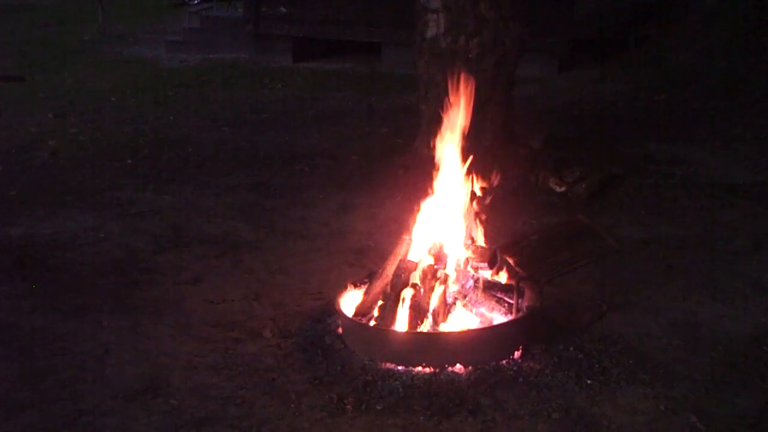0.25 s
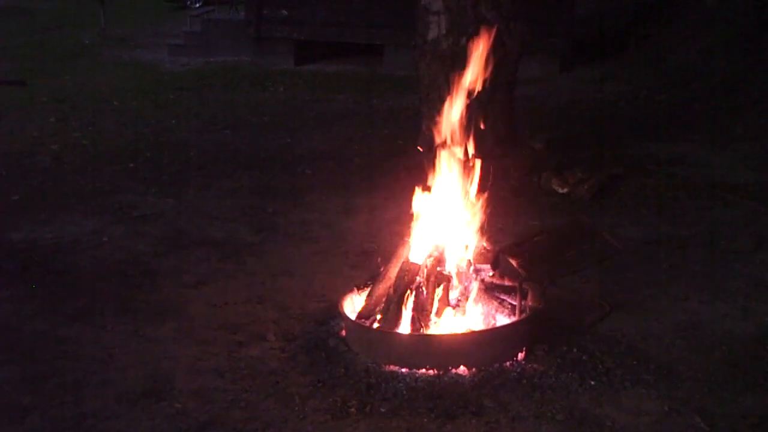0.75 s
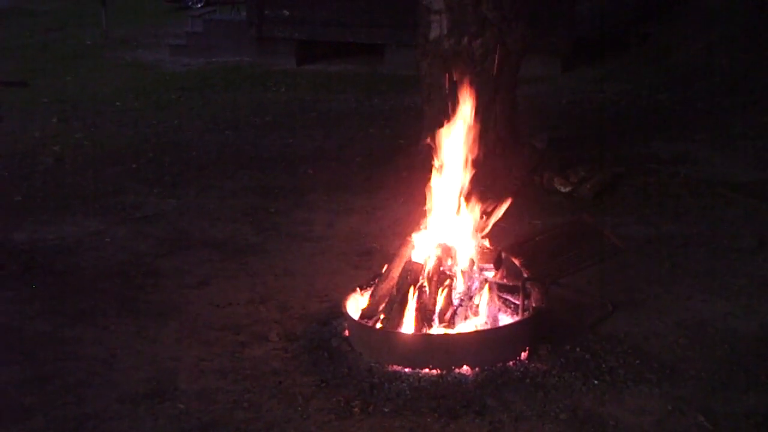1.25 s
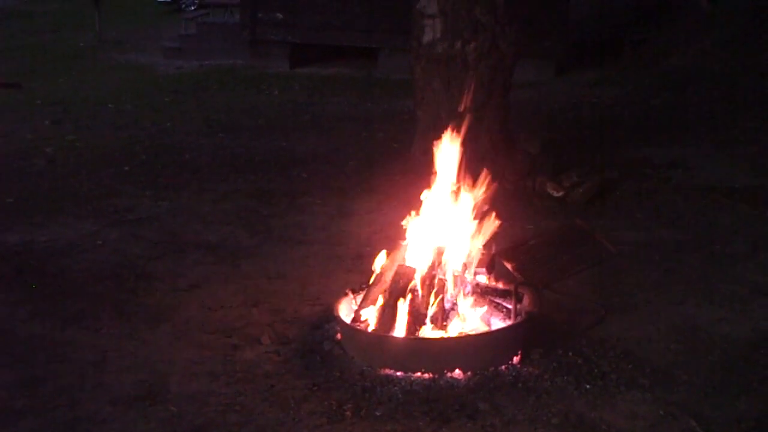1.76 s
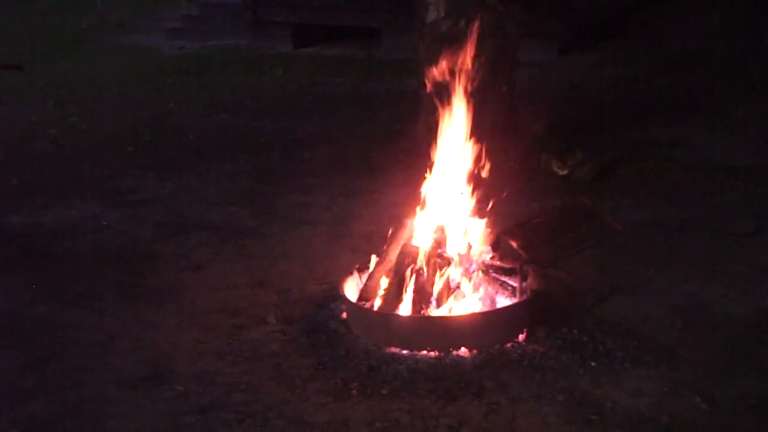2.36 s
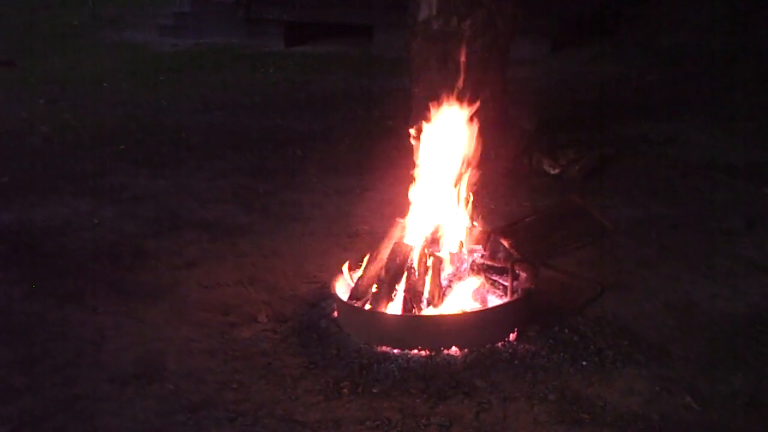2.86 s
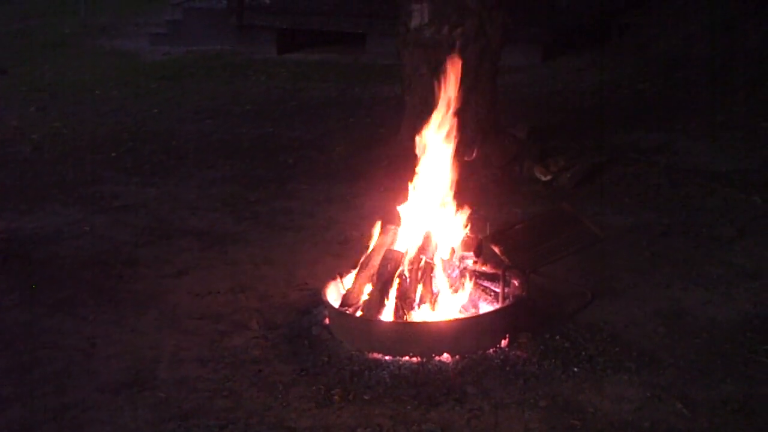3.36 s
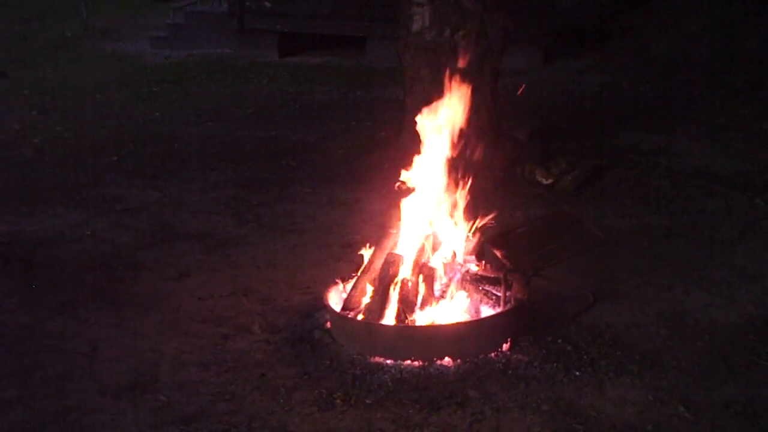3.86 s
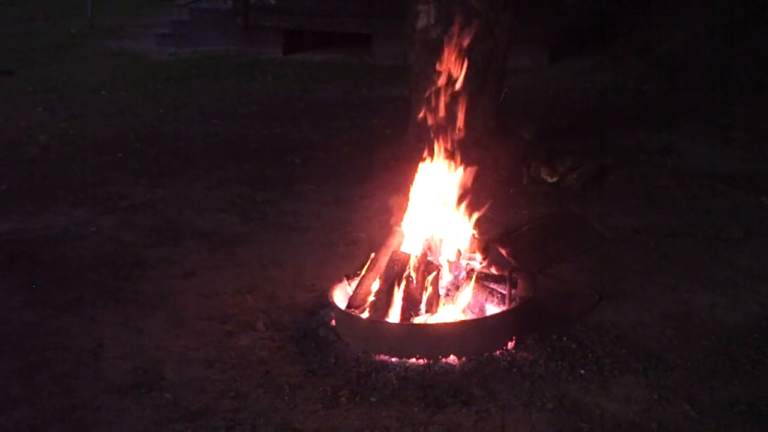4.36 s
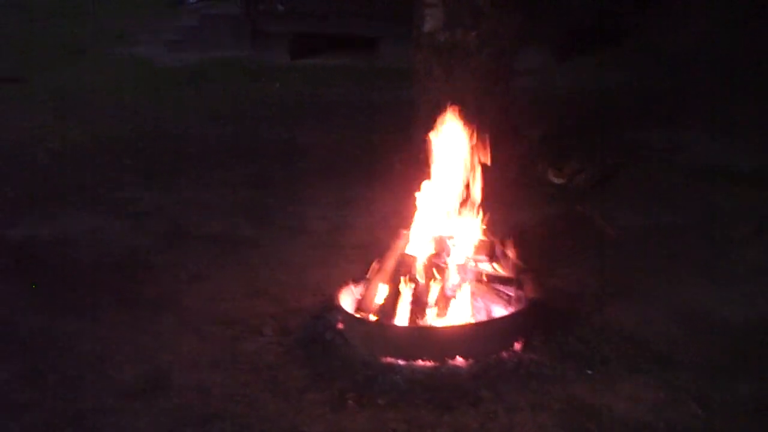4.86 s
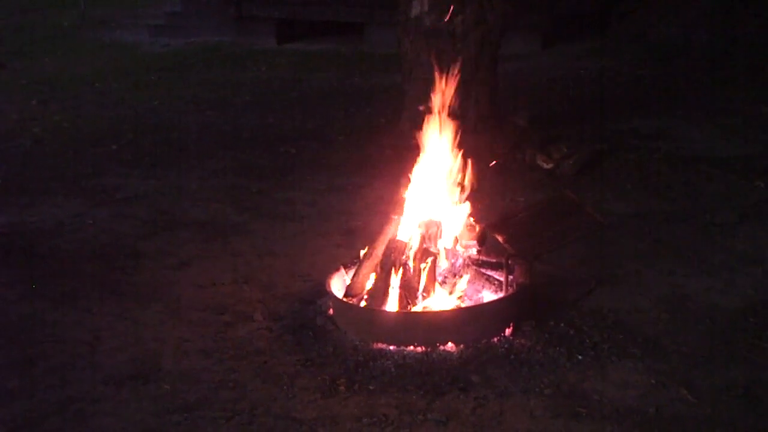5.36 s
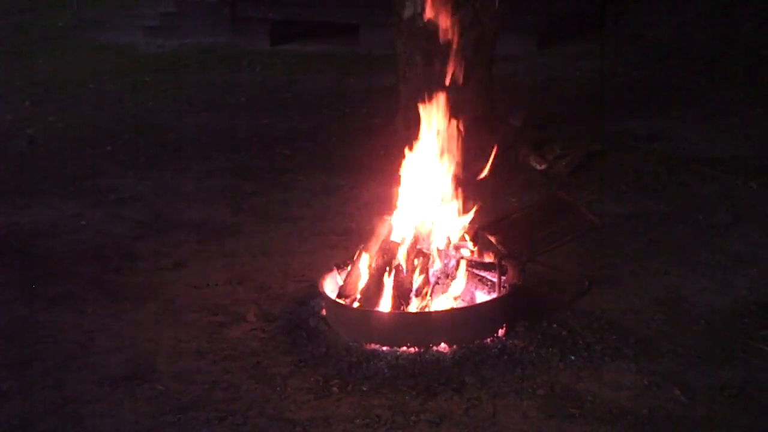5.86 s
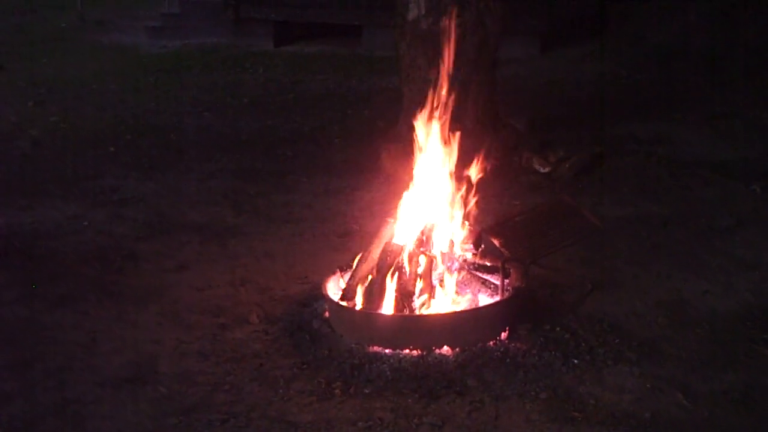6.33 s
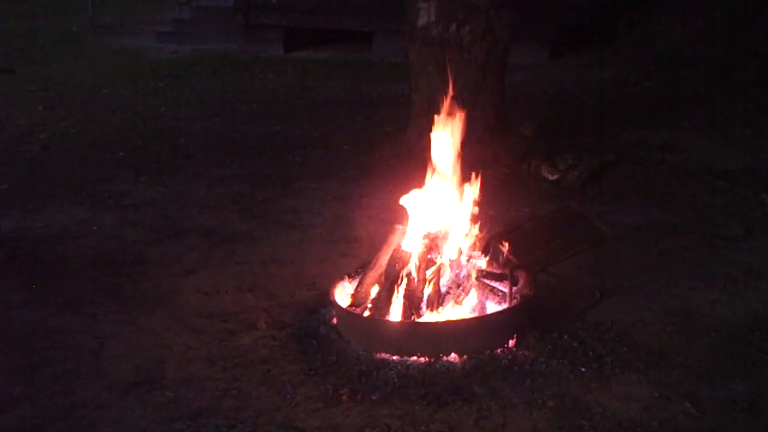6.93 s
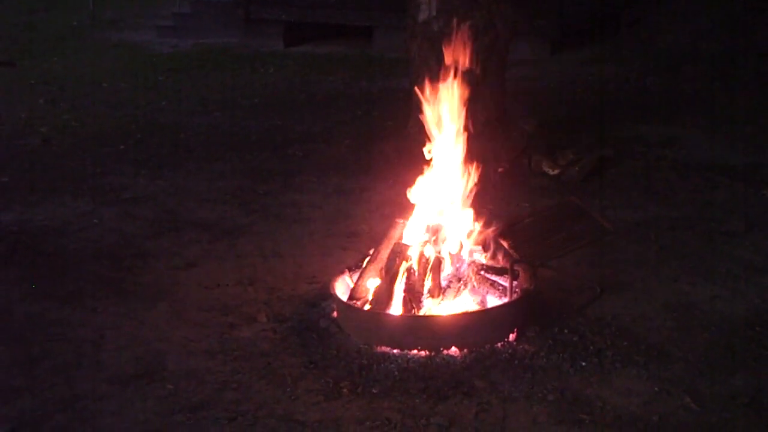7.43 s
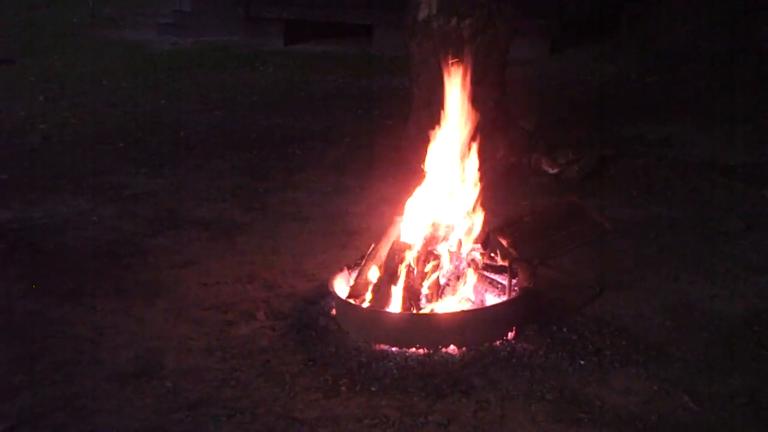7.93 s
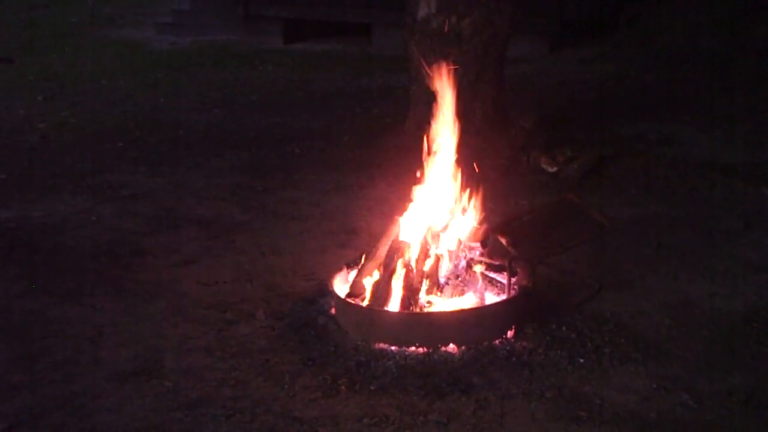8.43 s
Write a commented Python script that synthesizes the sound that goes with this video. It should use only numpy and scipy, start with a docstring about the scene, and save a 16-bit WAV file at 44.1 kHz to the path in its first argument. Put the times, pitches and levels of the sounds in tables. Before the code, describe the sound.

A wood fire flutters, rumbles and crackles in a yard at dusk, one huge snap ringing out over faint insects, cricket and katydid trills.

```python
"""A wood fire flutters and rumbles in a yard at dusk: dips of flame pressure over turbulent noise.
Behind it a far insect chorus shimmers in noise bands, a machine and a thin whine sound faintly in sines.
Soon the logs tick, pop and spit gas: clicks, bursts and grains ring resonances and echo off trees and a house.
A cricket and a katydid trill in pulsed tones, one very loud snap clips, a far bird whistles once in a gliding
sine, and near the end a jet of flame flares on a rough, hollow note."""
import sys
import numpy as np
from scipy import signal
from scipy.fft import rfft, irfft
from scipy.io import wavfile

SR = 44100
rng = np.random.default_rng(int(sys.argv[2]) if len(sys.argv) > 2 else 0)


def unload_audio(sound):
    """Save the sound as a 16-bit wav file, at the path given as the first command line argument."""
    columns = np.transpose(np.atleast_2d(sound))
    # keep every value between -1 and 1, then stretch to whole-number steps
    steps = np.round(np.clip(columns, -1, 1) * 32767)
    wavfile.write(sys.argv[1], SR, steps.astype(np.int16))


N = 383229
TIME = np.arange(N) / SR
FREQ = np.arange(N // 2 + 1) * SR / N


def undb(db):
    """Decibels to gain."""
    return 10 ** (np.asarray(db) / 20)


def unit(x):
    """Scale to rms 1."""
    return x / np.sqrt(np.mean(x ** 2))


def add(track, start_s, sound):
    """Mix a short sound into a track at a time."""
    i = int(start_s * SR)
    track[i:i + len(sound)] += sound[:N - i]


def colour(x, points):
    """Filter by a spectrum of (Hz, dB) points, interpolated over log frequency."""
    hz, db = np.transpose(points)
    gain = undb(np.interp(np.log(FREQ + 1), np.log(hz), db))
    return irfft(rfft(x) * gain, N)


def resonate(x, hz, width_hz):
    """A two-pole resonance."""
    b, a = signal.iirpeak(min(hz, SR / 3), hz / min(width_hz, SR / 4), fs=SR)
    return signal.lfilter(b, a, x)


def walk(rate_hz):
    """Smooth chance with spread 1."""
    return unit(irfft(rfft(rng.standard_normal(N)) / (1 + (FREQ / rate_hz) ** 4), N))


def wide_noise(side):
    """Two channels of noise that partly agree."""
    mid, other = rng.standard_normal((2, N))
    return mid + side * other * np.array([[1], [-1]])


def envelope(start_s, length_s, attack_s, release_s):
    """Rise, hold and fall, with rounded corners."""
    rise = (TIME - start_s) / attack_s
    fall = (start_s + length_s - TIME) / release_s
    return np.sin(np.pi / 2 * np.clip(np.minimum(rise, fall), 0, 1)) ** 2


def bouts(rows, attack_s, release_s):
    """Loudness of a sound that comes in bouts of (start s, length s, dB)."""
    return sum(undb(db) * envelope(start_s, length_s, attack_s, release_s) for start_s, length_s, db in rows)


def burst(hz, width_hz, decay_s, grit, size=1100):
    """A break with a few splinters behind it rings a steep resonance; rms 1 over 5 ms."""
    push = grit * rng.standard_normal(size) * np.exp(-np.arange(size) / SR / decay_s)
    push[0] += 1
    ring = resonate(resonate(push, hz, width_hz), hz, 2 * width_hz)
    return ring * np.sqrt(SR / 200 / np.sum(ring ** 2))


# One flap of the flames. Each row: frequency in Hz, relative level in dB.
FLAP_SPECTRUM = [(8, -5.5), (25, 1.5), (60, -0.5), (110, -7.5), (200, -18), (400, -34.5), (900, -60)]
# Rush of the flames. Each row: frequency in Hz, relative level in dB per Hz.
RUSH_SPECTRUM = [(10, 2.5), (25, 3), (50, 1), (90, -7), (130, -14), (200, -17), (300, -21), (500, -29),
                 (900, -34.5), (1500, -38.5), (3000, -38.5), (6000, -88.5)]
# The flames draw harder. Each row: start in seconds, length in seconds, level in dB.
DRAUGHTS = [(0, .6, -70), (7.25, 0.84, -71)]
DRAUGHT_ATTACK_S, DRAUGHT_RELEASE_S, DRAUGHT_HZ = 0.12, .2, 375
FLUTTER_DB, RUSH_DB, FLAPS_PER_S = -49.5, -51.0, 31


def flames(count=400):
    """The flame sheet collapses in soft dips of pressure, over a turbulent rush that surges now and then."""
    gap, strength = rng.standard_normal((count, 2)).T
    times_s = np.cumsum(np.exp(0.27 * gap) / FLAPS_PER_S)
    sizes = undb(3.3 * np.minimum(strength, 1))
    pulses = np.zeros(N)
    for start_s, size in zip(times_s, sizes):
        add(pulses, min(start_s, N / SR), np.array([size]))
    flutter = colour(pulses.mean() - pulses, FLAP_SPECTRUM)
    rush = colour(rng.standard_normal(N), RUSH_SPECTRUM) * undb(2.5 * walk(8))
    draw = resonate(resonate(rng.standard_normal(N), DRAUGHT_HZ, 280), DRAUGHT_HZ, 500)
    draught = bouts(DRAUGHTS, DRAUGHT_ATTACK_S, DRAUGHT_RELEASE_S) * unit(draw)
    return undb(FLUTTER_DB) * unit(flutter) + undb(RUSH_DB) * unit(rush) + draught


def insect_band(hz, width_hz, side):
    """Many wings near one pitch blur into a narrow band."""
    return unit(resonate(resonate(wide_noise(side), hz, width_hz), hz, width_hz))


# Far insects. Each row: centre in Hz, width in Hz, level in dB, stereo spread from 0 to 1.
INSECT_BANDS = [(4833, 875, -65, 0.33), (2261, 300, -77, 0), (6570, 685, -87.5, 0.7), (7970, 330, -86.5, 1)]


def chorus():
    """The far insects shimmer steadily from all around."""
    return sum(undb(db + .5 * walk(14)) * insect_band(hz, width_hz, side)
               for hz, width_hz, db, side in INSECT_BANDS)


# Machine tones. Each row: frequency in Hz, mean level in dB.
HUM_TONES = [(60.6, -55), (95, -64), (121, -67)]


def hum():
    """A far machine, its low tones wavering in level and phase."""
    out = np.zeros(N)
    for hz, db in HUM_TONES:
        tone = np.sin(2 * np.pi * hz * TIME + 0.42 * walk(1.06))
        out += undb(db + 1.2 * walk(1.0)) * unit(tone)
    return out


# High tones. Each row: frequency in Hz, level in dB.
WHINE_TONES = [(7837, -84), (7897, -86)]


def whine():
    """Two close high tones, barely there, their phase drifting apart between left and right."""
    out = np.zeros((2, N))
    for hz, db in WHINE_TONES:
        drift_rad = 1.1 * np.array([walk(3.06), walk(3.1)])
        out += undb(db) * unit(np.sin(2 * np.pi * hz * TIME + drift_rad))
    return out


# Still evening air. Each row: frequency in Hz, relative level in dB per Hz.
AIR_SPECTRUM = [(100, -35.5), (300, 7), (900, 3), (1600, -1), (2100, -6), (3500, -2.5), (6000, -12.5),
                (7500, -17), (13000, -29.5)]
AIR_DB, HISS_DB = -73, -72


def air():
    """The hush of the yard, and a faint even hiss of its own in each microphone."""
    hush = unit(colour(wide_noise(0.41), AIR_SPECTRUM))
    return undb(AIR_DB) * hush + undb(HISS_DB) * rng.standard_normal((2, N))


def embers(count=240):
    """Many faint ticks, a few of them stronger, each with its own pitch."""
    out = np.zeros(N)
    for when, strength, pitch in rng.random((count, 3)):
        db = -74 + 9 * strength ** 3
        hz = 5200 * .09 ** (pitch ** 2)
        add(out, when * N / SR, undb(db) * burst(hz, .5 * hz, decay_s=0.00031, grit=0.11))
    return out


# Louder pops of the logs, levels before the shared colour; the row at 4.8651 s is instead the fire's steel
# ring, struck by a falling piece. Each row: start in seconds, click level in dB, bright crack level in dB, its
# Hz, dull crack level in dB, its Hz, knock level in dB, its Hz, t60 of the ring in seconds.
LOG_POPS = [(0.1398, -65, -78, 4500, -78, 2800, -53.5, 596, .025),
            (.165, -65, -72, 4500, -72, 3200, -65, 850, .01),
            (.345, -33, -53, 4760, -52.5, 2930, -58.5, 610, 0.0076),
            (.478, -68, -78, 4500, -80, 2800, -64, 720, .012),
            (0.5205, -60, -69, 4570, -78, 2800, -58, 500, 0.013),
            (.758, -52, -58.5, 4640, -57, 2800, -58.5, 1410, .0069),
            (.8338, -48, -59.5, 4820, -67, 2800, -64, 583, 0.0092),
            (0.9304, -46, -62, 5200, -62, 2900, -73, 656, .01),
            (1.1562, -51, -65, 4500, -54, 2640, -47.5, 940, .02),
            (1.2485, -50, -60, 5200, -82, 2800, -82, 1060, .01),
            (1.481, -30, -47, 5100, -55, 2900, -57.5, 880, 0.0087),
            (2.1917, -55, -67, 4670, -72, 2800, -61, 760, 0.0092),
            (2.2622, -60, -78, 4500, -78, 2800, -59, 567, 0.027),
            (2.4494, -56, -60, 4800, -59.5, 2480, -64, 940, .0092),
            (2.5808, -36, -58, 4300, -58, 3300, -57.5, 690, .0085),
            (3.158, -51, -66, 4610, -59.5, 2700, -67, 603, .01),
            (3.5735, -49, -68, 4810, -62, 2810, -80, 1337, .01),
            (3.719, -40, -61, 4710, -58.5, 2900, -57.5, 630, .0096),
            (4.078, -52, -65, 4500, -61.5, 3200, -75, 700, .01),
            (4.123, -48, -61, 5880, -66, 2800, -67.5, 1415, .01),
            (4.297, -33, -51, 5520, -60, 2900, -63, 621, .013),
            (4.8223, -54, -62, 4200, -57.5, 3050, -66, 647, .01),
            (4.8353, -29, -51.5, 5700, -47.5, 2670, -56, 850, .011),
            (4.8489, -33, -44.5, 5200, -46.5, 2950, -56, 680, .01),
            (4.8651, -43, -49.5, 4400, -55, 2900, -52, 713, .14),
            (4.874, -36, -43, 4350, -52, 1900, -56, 1300, .0067),
            (4.89, -52, -60, 5200, -70, 2800, -64, 900, .01),
            (4.9026, -50, -65, 5600, -64, 3100, -64, 520, .02),
            (5.244, -45, -62, 5400, -64, 2900, -70, 1300, .01),
            (5.4062, -41, -57.5, 5650, -62, 3050, -66, 440, .01),
            (5.9607, -37, -61, 4670, -53.5, 2700, -58.5, 590, .015),
            (6.361, -49, -66, 5190, -74, 2800, -74, 700, .01),
            (6.5379, -41, -57.5, 5185, -63, 2800, -67, 540, .01),
            (7.0776, -42.5, -57.5, 5250, -56, 2770, -57, 603, .061),
            (7.6613, -57.5, -61, 4600, -66, 2795, -67, 542, 0.0088),
            (8.2047, -38, -59, 4800, -46.5, 2720, -56, 700, .01)]
RING_OVER_KNOCK_DB = 5.5


def pops():
    """Steam pockets click, ring two resonances of the wood and knock the log, which rings on hollowly; one
    strike sets the fire's steel ring ringing longer."""
    out, t = np.zeros(N), TIME[:SR // 4]
    for start_s, click_db, bright_db, bright_hz, dull_db, dull_hz, knock_db, knock_hz, t60_s in LOG_POPS:
        bright = burst(bright_hz, .3 * bright_hz, decay_s=.001, grit=.13)
        dull = burst(dull_hz, .3 * dull_hz, decay_s=.001, grit=.1)
        knock = burst(knock_hz, .6 * knock_hz, decay_s=.006, grit=.065)
        ring_gain = undb(knock_db + RING_OVER_KNOCK_DB - 60 * t / t60_s)
        add(out, start_s, undb(bright_db) * bright + undb(dull_db) * dull + undb(knock_db) * knock)
        add(out, start_s, undb([click_db]))  # a single sample
        add(out, start_s, ring_gain * np.sin(2 * np.pi * knock_hz * t))
    return out


# Gas leaving the wood, levels before the shared colour. Each row: start in seconds, rise in seconds, fade in
# seconds, level in dB, centre in Hz, width in Hz.
GAS_SPURTS = [(.16, .04, .13, -65.5, 3300, 2600), (.72, 0.036, 0.22, -67, 3300, 3000),
              (1.31, 0.024, .066, -62, 3600, 2400), (1.853, 0.019, 0.14, -59, 5260, 3000),
              (1.86, 0.019, .1, -63.5, 3540, 900), (2.572, 0.017, 0.13, -56, 5040, 1000),
              (2.585, .007, 0.014, -54.5, 4100, 250), (2.606, .01, 0.026, -49.5, 4180, 300),
              (4.06, 0.058, .087, -65, 3200, 3000), (4.665, .037, .065, -65, 2600, 2520),
              (4.838, 0.021, 0.031, -50, 4800, 1000), (5.21, .03, .071, -61.5, 3300, 2400),
              (5.42, 0.046, 0.15, -69, 3400, 2200), (6.91, 0.038, 0.086, -65.5, 3540, 3000),
              (8.02, 0.041, .08, -69.5, 3190, 1800), (8.19, 0.014, 0.046, -59, 2300, 1500)]
# Hiss of the gas. Each row: frequency in Hz, relative level in dB per Hz.
GAS_SPECTRUM = [(200, -8), (700, -5), (2000, -1), (3100, -5), (4500, -5), (6900, -2), (7900, -11.5),
                (13000, -24)]
GRAINS_PER_S = 3500


def sizzles():
    """Spurts of gas: tiny bursts of sap ring a crevice, rise quickly and fade; a narrow crevice squeaks."""
    grains = rng.standard_normal(N) * (rng.random(N) < GRAINS_PER_S / SR)
    gas = colour(grains * undb(2 * walk(200)), GAS_SPECTRUM)
    out = np.zeros(N)
    for start_s, rise_s, fade_s, db, hz, width_hz in GAS_SPURTS:
        spurt = unit(resonate(resonate(gas, hz, width_hz), hz, 4 * width_hz))
        out += undb(db) * envelope(start_s, rise_s + fade_s, rise_s, fade_s) * spurt
    return out


# The shared colour of the crackle. Each row: frequency in Hz, gain in dB.
CRACKLE_TONE = [(1500, 0), (3000, -1), (3900, 0.5), (5200, 1.5), (7000, -2), (9000, 3.5), (13000, -6)]


def small_cracks():
    """Pops, ticks and gas spurts, given one shared colour."""
    return colour(pops() + embers() + sizzles(), CRACKLE_TONE)


# Yard reflections, levels before their colour. Each row: delay in seconds, smear in seconds, level in dB.
REFLECTIONS = [(.0022, .001, -24.5), (.0075, .00284, -25.5), (.020, .0042, -34.5), (.035, .004, -42.5),
               (.200, .024, -36.5), (.295, .036, -39)]
# Colour of reflections and tail. Each row: frequency in Hz, gain in dB.
REFLECTION_TONE = [(700, 1.5), (1800, 2.5), (3200, 7), (4400, -2), (5200, -1), (6000, -2), (6800, 1.5),
                   (7700, -9), (12000, 1)]
# Flat house wall. The row: delay in seconds, level in dB.
HOUSE_WALL = (.1277, -37.5)


def yard(x, tail_db, t60_s):
    """Ground, ring and trees send back smeared echoes and a thin tail, the house a crisp one."""
    t = TIME[:SR // 2]
    power = undb(tail_db) ** 2 * unit(undb(-60 * t / t60_s)) ** 2
    for delay_s, smear_s, db in REFLECTIONS:
        age = np.maximum(t - delay_s, 0) / smear_s
        power = power + (undb(db) * unit(age * np.exp(-2 * age))) ** 2
    response = wide_noise(0.525)[:, :len(t)] * np.sqrt(power / len(t))
    smeared = signal.fftconvolve(x[None], response, axes=1)[:, :N]
    wall_delay_s, wall_db = HOUSE_WALL
    wall = np.zeros(N)
    add(wall, wall_delay_s, undb(wall_db) * x)
    return x + wall + colour(smeared, REFLECTION_TONE)


def off_centre(x):
    """The logs lie a little to the right, so the left channel hears them one sample later."""
    return np.array([np.r_[0, x[0, :-1]], x[1]])


def trill(loudness, hz, flat_hz, sag_hz, stroke_hz, slip, sharpness, waver_hz, blur, blur_width_hz, side):
    """Each wing stroke is a short pure note that sags, flatter when sung softly; the yard blurs it a little."""
    stroke = (stroke_hz * TIME + slip * walk(2)) % 1
    flattening_hz = flat_hz * (1 - loudness / loudness.max())
    pitch_hz = hz - flattening_hz - sag_hz * (stroke - .5) + waver_hz * walk(40)
    strength = np.sin(np.pi * stroke) ** sharpness * undb(walk(22))
    note = strength * np.sin(2 * np.pi * np.cumsum(pitch_hz) / SR)
    return loudness * unit(unit(note) + blur * insect_band(hz, blur_width_hz, side))


# Nearest cricket. Each row: start in seconds, length in seconds, level in dB.
CRICKET_BOUTS = [(1.8, 2.17, -72), (6.75, 2.3, -71.5)]
CRICKET_ATTACK_S, CRICKET_RELEASE_S = 0.59, 0.08


def cricket():
    """Slow, low wing strokes that swell and stop short."""
    return trill(bouts(CRICKET_BOUTS, CRICKET_ATTACK_S, CRICKET_RELEASE_S),
                 hz=2450, flat_hz=170, sag_hz=150, stroke_hz=43.8, slip=.025, sharpness=3.6,
                 waver_hz=9, blur=.2, blur_width_hz=140, side=.2)


def cavity(hz, swell_s):
    """A few cycles of a small cavity that swell to peak 1 and die."""
    age_s = TIME[:SR // 50]
    swell = (age_s / (2 * swell_s)) ** 2 * np.exp(2 - age_s / swell_s)
    return swell * np.sin(2 * np.pi * hz * age_s)


# The loud snap, before clipping. The row: start in seconds, peak in dB, ring in Hz, swell time in seconds.
LOG_SNAP = (2.6372, 3.3, 4920, .00022)
# Its splintering edge. Each row: frequency in Hz, gain in dB.
SPLINTER_SPECTRUM = [(150, -23.5), (400, -8), (1500, -.5), (2200, 4), (2900, -8), (3300, 9.5), (4200, 3),
                     (6000, 13), (7000, 14.5), (8200, 0), (8800, -3.5), (12800, -14), (14000, -20)]
# Sputter of the split. Each row: start in seconds, peak in dB, ring in Hz.
SPLIT_SPUTTER = [(2.6388, -24, 5500), (2.6455, -23, 4980), (2.6487, -30, 5100), (2.6585, -31, 5080),
                 (2.6625, -37, 4950), (2.672, -47, 5160), (2.678, -45, 5250), (2.708, -49, 5040),
                 (2.719, -53, 4670), (2.751, -49, 5200), (2.777, -49, 5360), (2.784, -47, 5070)]
SPUTTER_SWELL_S = 0.0006


def snap():
    """A log splits: a broad splintering click sets off a small cavity, which sputters on unevenly."""
    snap_s, peak_db, ring_hz, swell_s = LOG_SNAP
    out = colour(signal.unit_impulse(N, int(snap_s * SR)), SPLINTER_SPECTRUM)
    add(out, snap_s, undb(peak_db) * cavity(ring_hz, swell_s))
    for start_s, db, hz in SPLIT_SPUTTER:
        add(out, start_s, undb(db) * cavity(hz, SPUTTER_SWELL_S))
    return out


# Katydid, first soft and then full. Each row: start in seconds, length in seconds, level in dB.
KATYDID_BOUTS = [(3.2, 2.05, -72), (4.87, 1.55, -61.8)]
KATYDID_ATTACK_S, KATYDID_RELEASE_S = .4, 0.46


def katydid():
    """Faster, higher wing strokes with a deep sag and more blur."""
    return trill(bouts(KATYDID_BOUTS, KATYDID_ATTACK_S, KATYDID_RELEASE_S),
                 hz=4830, flat_hz=110, sag_hz=780, stroke_hz=60.4, slip=.035, sharpness=3.2,
                 waver_hz=36, blur=.5, blur_width_hz=450, side=.6)


# A dropped piece. The row: start in seconds, level in dB, pitch in Hz.
DROPPED_PIECE = (4.8625, -50, 340)


def thud():
    """A burnt piece falls against the fire's steel ring with a short, soft bump."""
    start_s, db, hz = DROPPED_PIECE
    out = np.zeros(N)
    add(out, start_s, undb(db) * burst(hz, .7 * hz, decay_s=.002, grit=.04))
    return out


def trees(x, t60_s):
    """A sound scattered by trees into a fading tail of the same energy."""
    tail = wide_noise(0.065)[:, :SR] * undb(-60 * TIME[:SR] / t60_s)
    return signal.fftconvolve(x[None], unit(tail) / np.sqrt(SR), axes=1)[:, :N]


# Far whistle, before the trees mix in. The row: start in seconds, length in seconds, peak level in dB.
BIRD_WHISTLE = (5.575, 0.53, -66)
WHISTLE_ATTACK_S, WHISTLE_RELEASE_S = 0.093, 0.3
WHISTLE_FROM_HZ, WHISTLE_TO_HZ, WHISTLE_GLIDE_S = 1880, 2294, 0.145
REEDY_AFTER_S, REEDY_FOR_S, REEDY_SHARE = 0.16, 0.064, 0.58  # brief third harmonic
TRUNKS_T60_S, TREES_T60_S = .12, 1.4


def bird():
    """One rising whistle, reedy and then pure, blurred by near trunks; its low note lingers among trees."""
    start_s, length_s, db = BIRD_WHISTLE
    age_s = np.maximum(TIME - start_s, 0)
    pitch_hz = WHISTLE_TO_HZ + (WHISTLE_FROM_HZ - WHISTLE_TO_HZ) * np.exp(-age_s / WHISTLE_GLIDE_S)
    phase = 2 * np.pi * np.cumsum(pitch_hz * (1 + .005 * walk(50))) / SR
    reedy = REEDY_SHARE * np.exp(-((age_s - REEDY_AFTER_S) / REEDY_FOR_S) ** 2)
    loudness = undb(db) * envelope(start_s, length_s, WHISTLE_ATTACK_S, WHISTLE_RELEASE_S)
    note = loudness * np.sin(phase)
    call = note + loudness * reedy * np.sin(3 * phase)
    return .8 * call + .3 * trees(call, TRUNKS_T60_S) + .9 * trees(note, TREES_T60_S)


# Flame through a gap between logs. Each row: start in seconds, length in seconds, level in dB.
FLAME_JETS = [(8.17, .15, -62), (8.315, 0.11, -56.5)]
FLARE_ATTACK_S, FLARE_RELEASE_S, FLARE_HZ = 0.052, 0.044, 277


def flare():
    """A jet of flame flutters on a rough, hollow note."""
    pitch_hz = FLARE_HZ + 18 * walk(45)
    note = np.sin(2 * np.pi * np.cumsum(pitch_hz) / SR) * undb(2.52 * walk(47))
    rush = unit(resonate(resonate(rng.standard_normal(N), FLARE_HZ, 130), FLARE_HZ, 200))
    return bouts(FLAME_JETS, FLARE_ATTACK_S, FLARE_RELEASE_S) * unit(unit(note) + 0.83 * rush)


def scene():
    """The fire in front, the night around it."""
    crackle = small_cracks() + snap() + thud()
    fire = flames() + off_centre(yard(crackle, tail_db=-27.5, t60_s=0.3)) + flare()
    night = chorus() + hum() + whine() + air() + cricket() + katydid() + bird()
    return fire + night


TOP_HZ, CEILING = 13100, .94


def record(dry):
    """The recorder clips just under full scale and cuts the top."""
    low_pass = signal.ellip(8, .2, 70, TOP_HZ, fs=SR, output="sos")
    return signal.sosfilt(low_pass, np.clip(dry, -CEILING, CEILING))


dry = scene()
out = record(dry)
unload_audio(out)
```